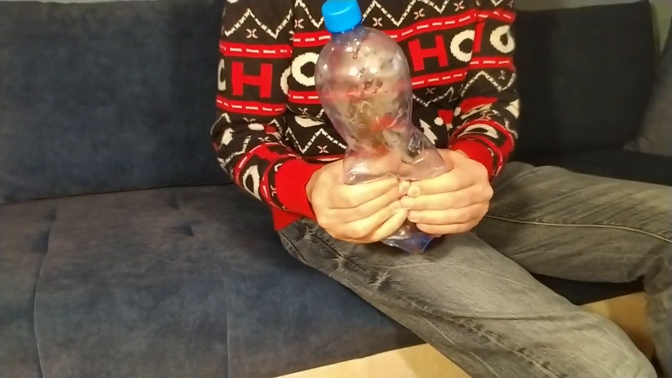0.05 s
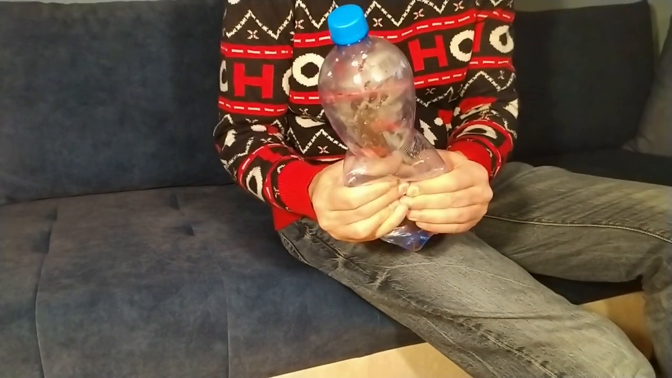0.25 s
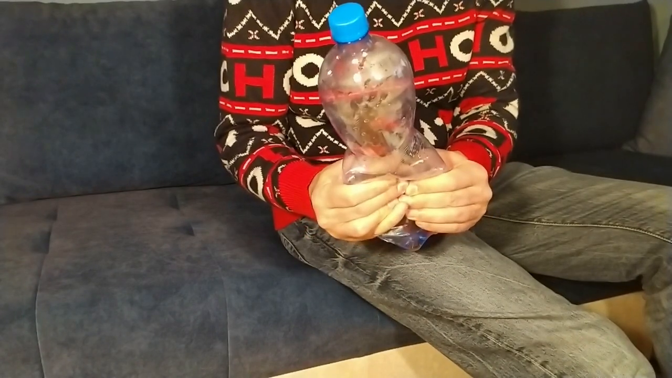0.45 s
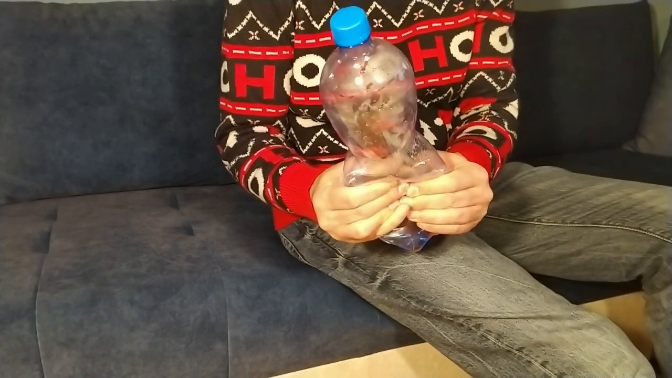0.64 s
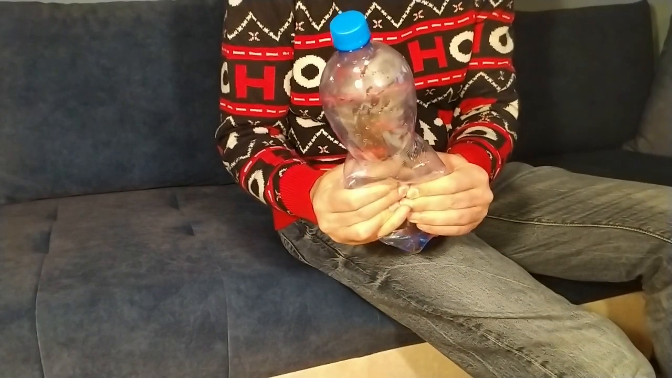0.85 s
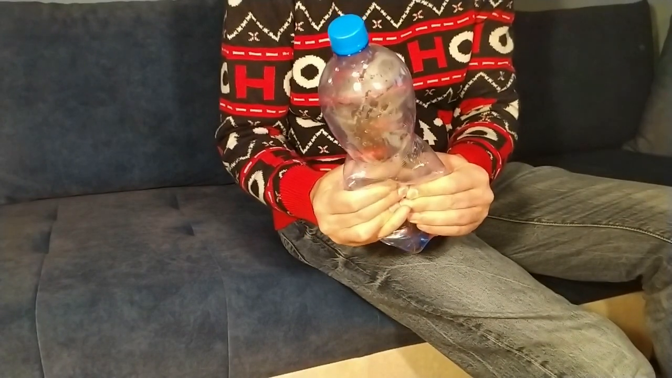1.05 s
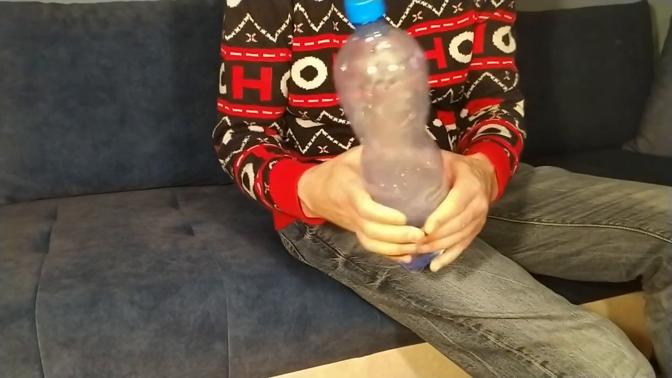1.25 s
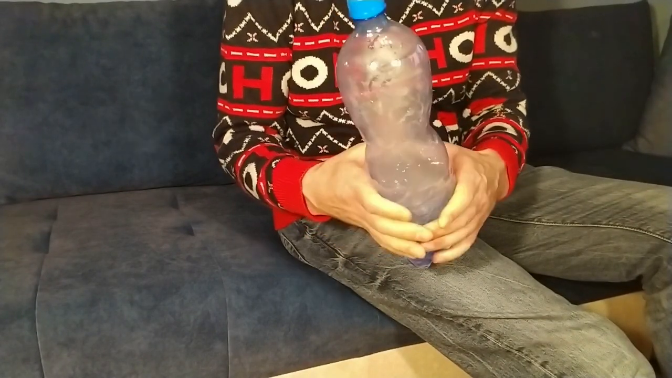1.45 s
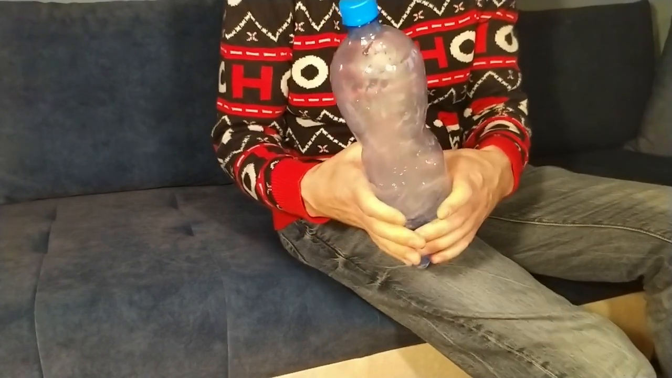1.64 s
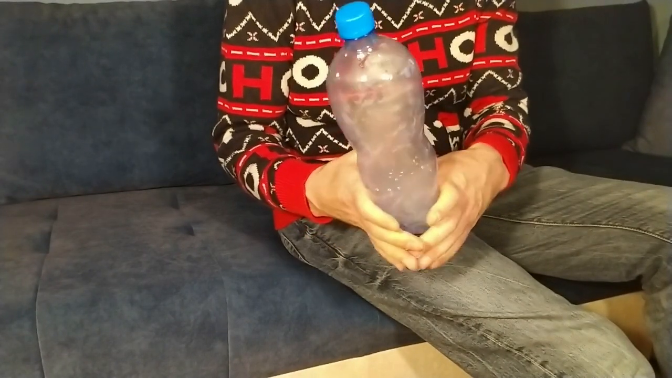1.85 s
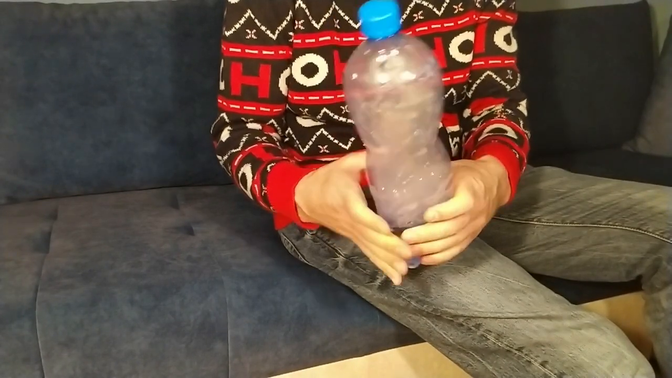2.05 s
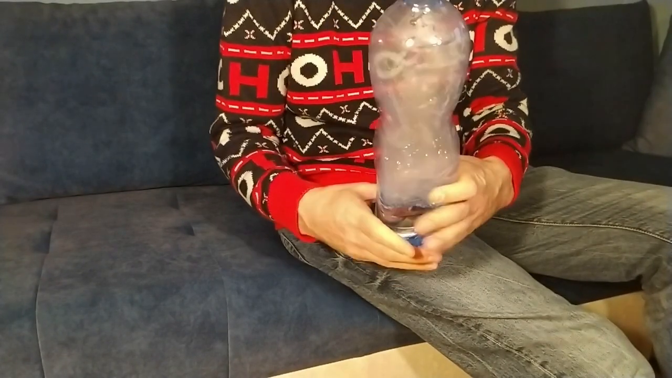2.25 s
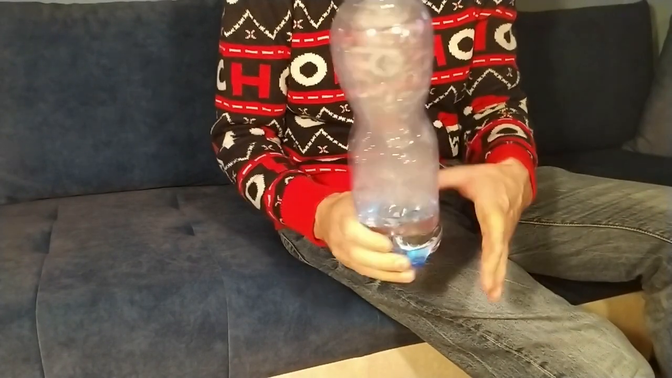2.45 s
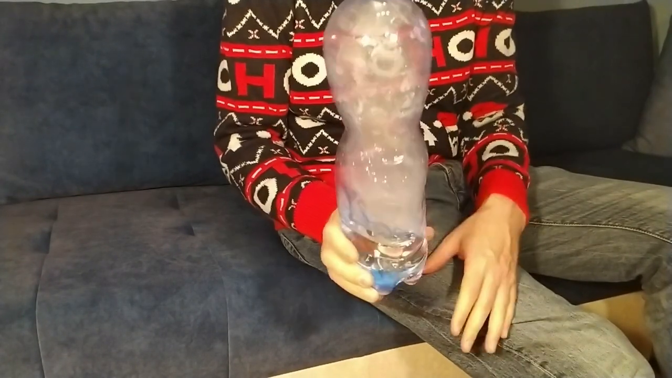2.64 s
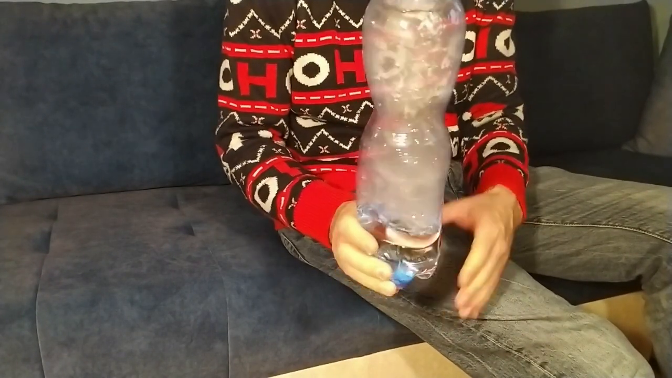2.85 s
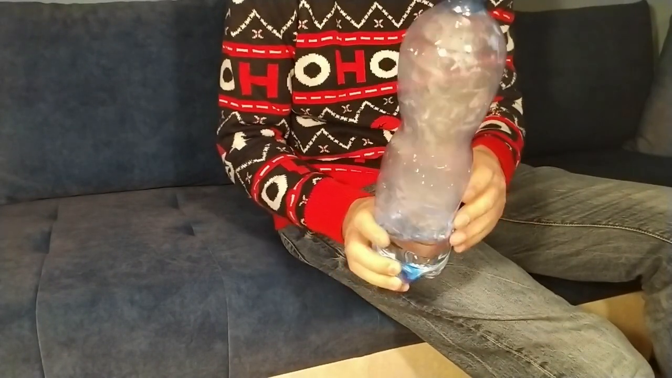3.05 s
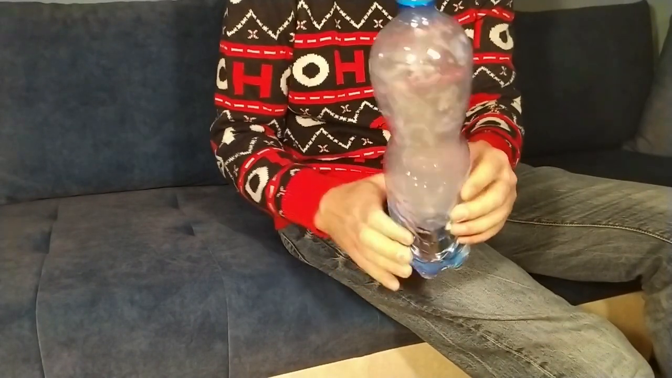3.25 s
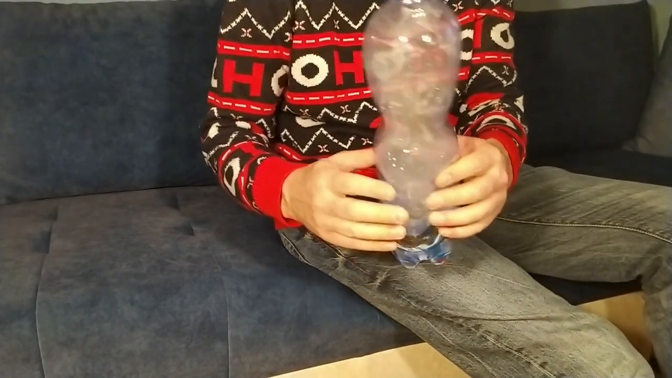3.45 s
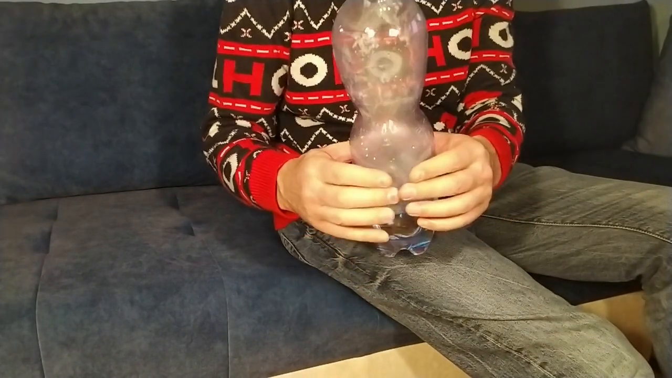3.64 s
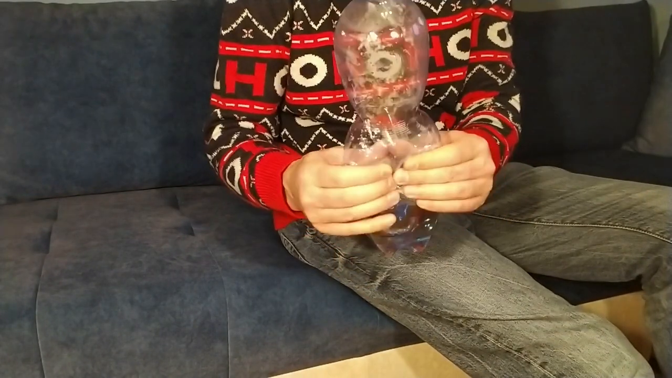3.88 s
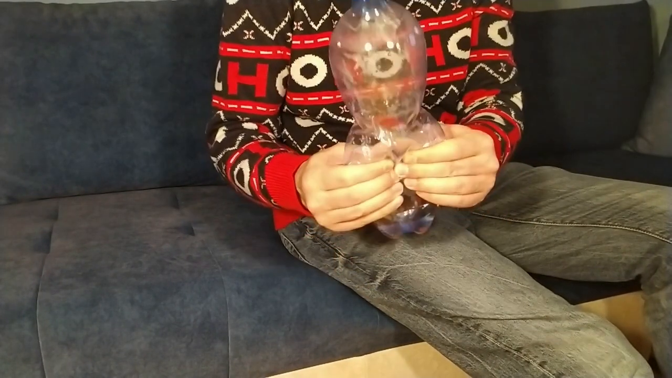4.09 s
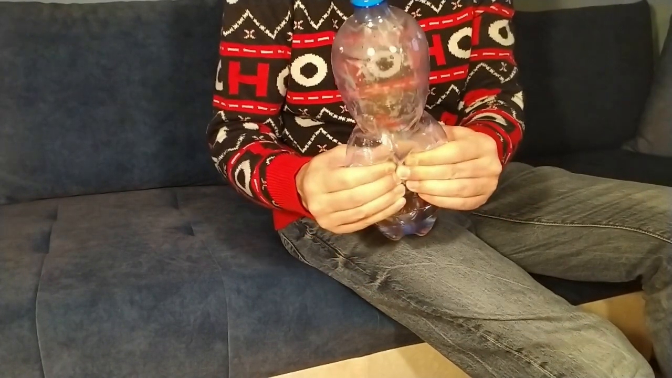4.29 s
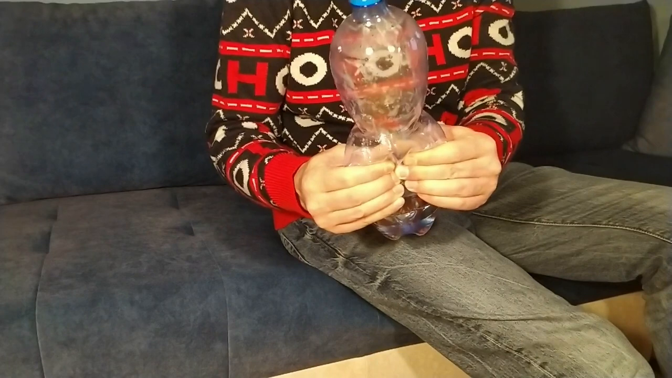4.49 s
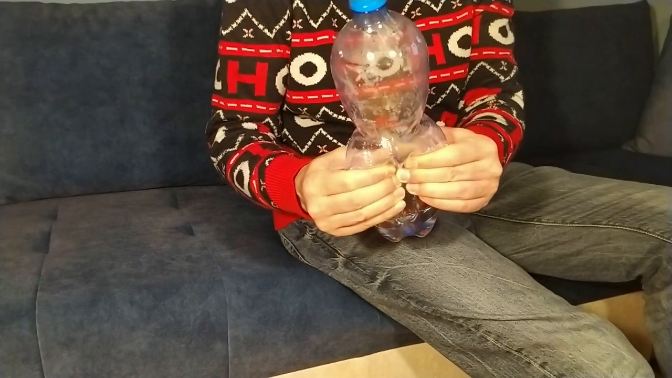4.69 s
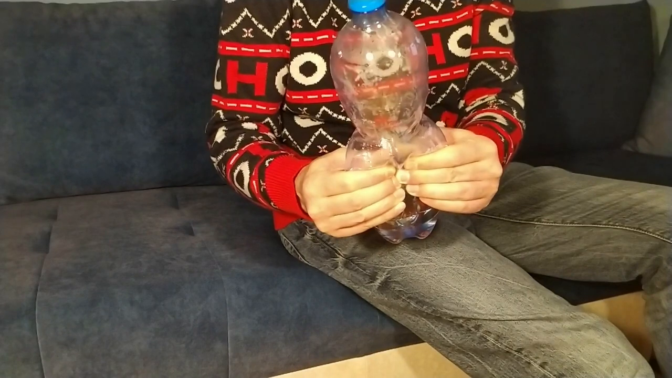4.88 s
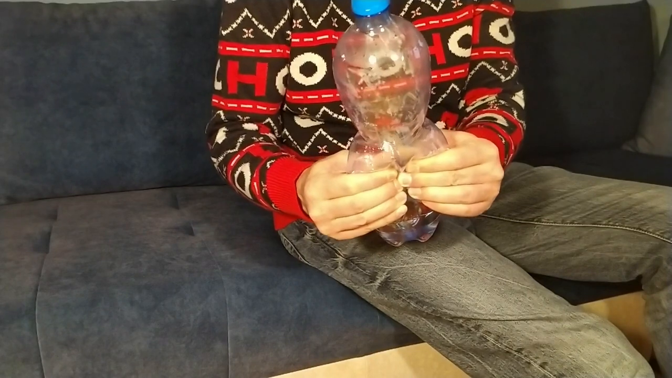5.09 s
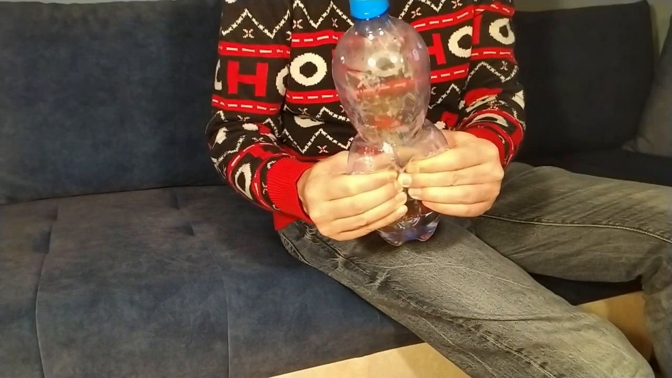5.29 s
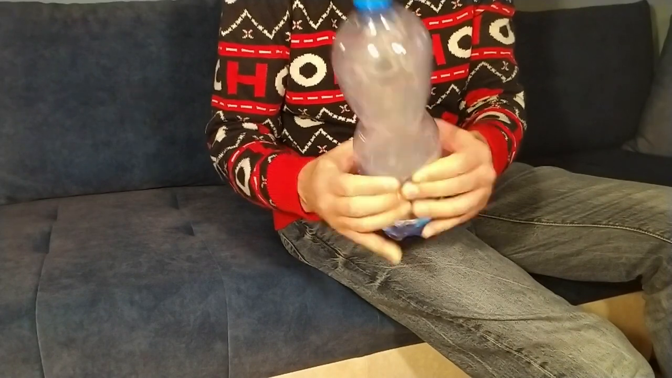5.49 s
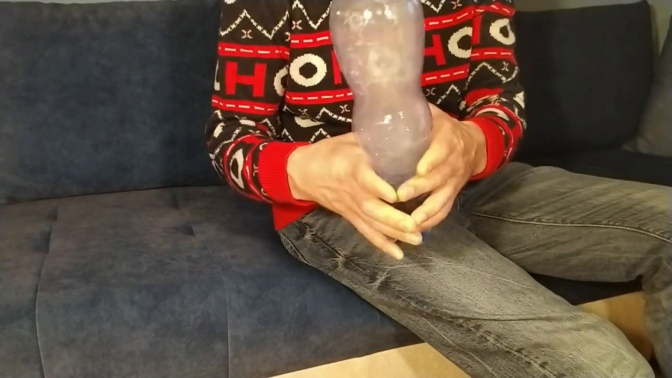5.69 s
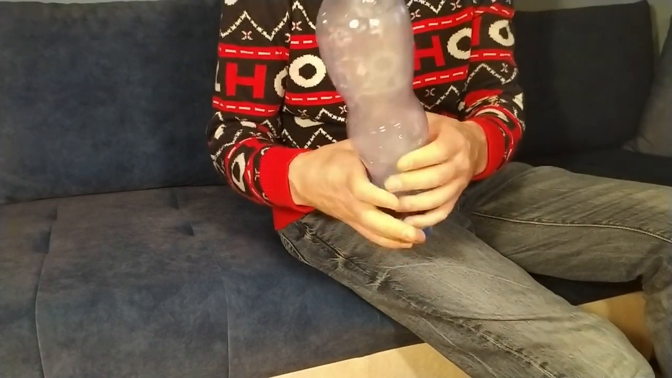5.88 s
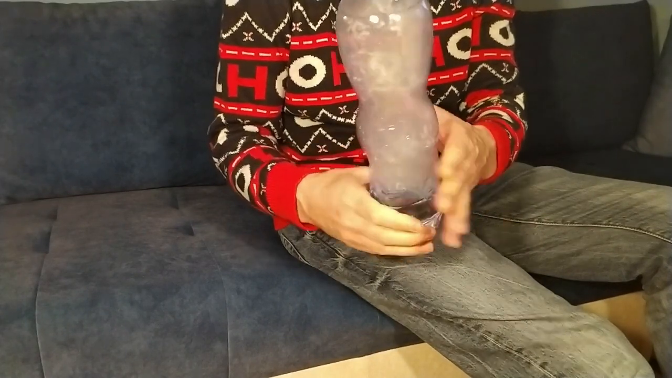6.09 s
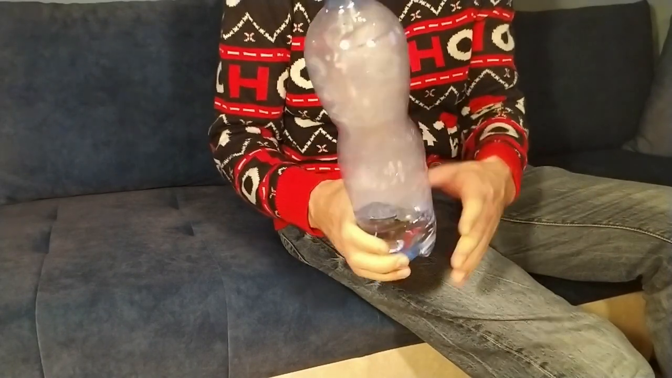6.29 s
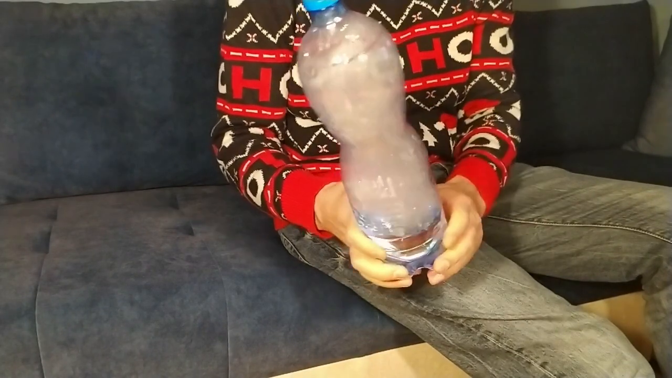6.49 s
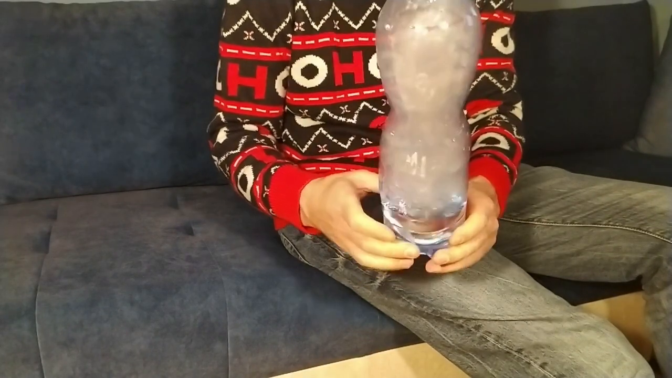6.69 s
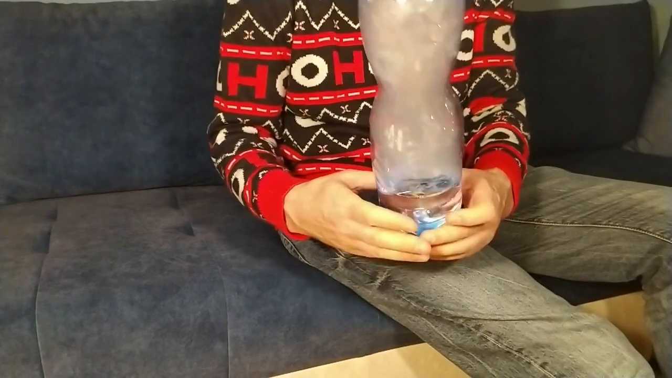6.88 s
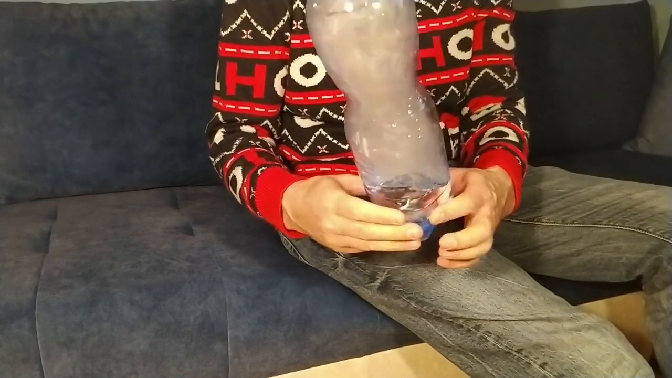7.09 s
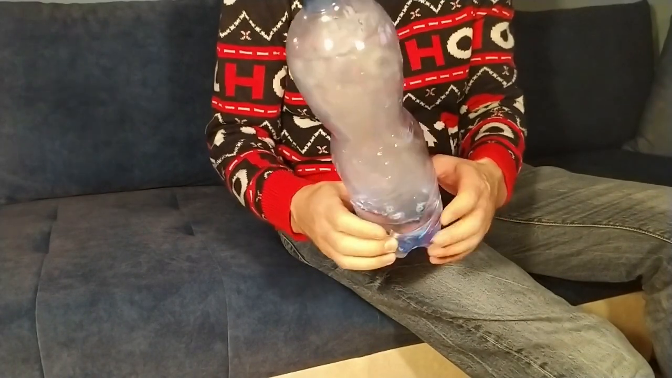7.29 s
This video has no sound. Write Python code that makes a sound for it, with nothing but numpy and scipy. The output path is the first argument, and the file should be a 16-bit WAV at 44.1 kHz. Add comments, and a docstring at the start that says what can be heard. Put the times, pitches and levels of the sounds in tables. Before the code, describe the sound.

Bursts of loud plastic snapping and popping as hands crush an empty drink bottle and let it spring back, with soft finger taps indoors.

```python
"""A thin plastic bottle is crushed and let go twice by hand, a metre or so from a stereo microphone in a small living room.
Each dent that buckles or springs back sends a bending wave through the wall: a sharp tick, then a short falling pop.
Small creases crackle while the wall moves; fingers tap it softly as they change grip, and one fingertip slips.
The regaining of shape adds two deep pushes of air. The room answers every snap, over faint rumble and hiss."""
import sys
import numpy as np
from scipy import signal
from scipy.fft import rfft, irfft, next_fast_len
from scipy.io import wavfile
from scipy.ndimage import map_coordinates

SR = 44100
rng = np.random.default_rng(int(sys.argv[2]) if len(sys.argv) > 2 else 0)


def waveform_to_disk(signal):
    """Save audio, clipped to [-1, 1], as 16-bit WAV at the path in sys.argv[1]."""
    frames = np.transpose(np.atleast_2d(signal))
    scaled = np.clip(frames, -1, 1) * 32767
    samples = np.round(scaled).astype(np.int16)
    wavfile.write(sys.argv[1], SR, samples)


N = 323253
TOP_HZ = 16150  # band limit
SPAN = 24576  # samples in which one snap dies away
HZ, T = np.fft.rfftfreq(SPAN, 1 / SR), np.arange(SPAN) / SR


def amp(db):
    """Decibels to gain."""
    return 10 ** (np.asarray(db) / 20)


def along(points, hz):
    """(Hz, value) points read on a log frequency axis."""
    f, v = np.transpose(points)
    return np.interp(np.log(hz + 1), np.log(f + 1), v)


def unit_energy(x):
    """Each channel scaled to energy 1."""
    return x / np.linalg.norm(x, axis=-1, keepdims=True)


def causal(db):
    """Minimum-phase response with the given gain on the HZ grid, by folding the cepstrum."""
    cepstrum = irfft(np.log(amp(db)))
    cepstrum[1:SPAN // 2] *= 2
    cepstrum[SPAN // 2 + 1:] = 0
    return np.exp(rfft(cepstrum))


def peak(hz, width_hz):
    """Bell of height 1 on the HZ grid."""
    return 1 / (1 + (2 * (HZ - hz) / width_hz) ** 2)


def paired(z, likeness):
    """Two unrelated spectra blended into left and right."""
    turn = np.arccos(np.clip(likeness, -1, 1)) / 2
    mid = z[0] * np.cos(turn)
    side = z[1] * np.sin(turn)
    return np.array([mid + side, mid - side])


# rumble and hiss spectrum: [f/Hz, density/dB per Hz, relative]
QUIET_HZ_DB = [(20, -3), (38, -14.5), (60, -13.5), (81, -23.5), (104, -13.5), (138, -24.5), (210, -19.5),
               (300, -28), (400, -29), (570, -32.5), (3300, -49), (10500, -48.5), (12000, -54),
               (16000, -71.5)]
# left-right likeness of the rumble and hiss: [f/Hz, likeness]
QUIET_LIKENESS = [(30, 0.19), (120, 0.0075), (400, 0.19), (1500, 0), (8000, 0.033)]


def still_room(level_db):
    """Low rumble of the house and microphone hiss, as shaped noise."""
    size = next_fast_len(N + SPAN)
    hz = np.fft.rfftfreq(size, 1 / SR)
    z = paired(rfft(rng.standard_normal((2, size))), along(QUIET_LIKENESS, hz))
    noise = irfft(z * amp(along(QUIET_HZ_DB, hz)), size)[:, :N]
    return amp(level_db) * noise / noise.std()


# decay of the room: [f/Hz, t60/s]
ROOM_T60_S = [(100, 0.12), (400, 0.3), (1200, 0.22), (3000, .3), (8000, 0.27), (14000, 0.25)]
# left-right likeness of scattered sound, also read by buckle(): [f/Hz, likeness]
LIKENESS = [(100, 1), (300, 1), (700, 0.057), (1500, .2), (4000, 0.036), (9000, -.1)]


def room_tail(rise_s, early, early_s):
    """Stereo room response: a rise, the first walls in a cluster, then an even decay."""
    hz, t, z = signal.stft(rng.standard_normal((2, SPAN)), SR, nperseg=256)
    decay = amp(-60 * t / along(ROOM_T60_S, hz)[:, None])
    tail = signal.istft(z * decay, SR, nperseg=256)[1][:, :SPAN]
    cluster = 1 + early * np.exp(-((T - rise_s) / early_s) ** 2)
    swell = np.clip(T / rise_s, 0, 1) ** 2 * cluster
    return paired(rfft(unit_energy(tail * swell)), along(LIKENESS, HZ))


# the whole crushed waist springs out: [t/s, level/dB before attack and decay, f/Hz]
SPRINGS_S_DB_HZ = [(1.325, -29.5, 102.5), (5.585, -36.5, 77.1)]


def spring_out(attack_s, t60_s):
    """One deep, short push of air, a decaying sine, each time the bottle regains its shape."""
    out = np.zeros(N + SPAN)
    for s, db, hz in SPRINGS_S_DB_HZ:
        envelope = amp(db - 60 * T / t60_s) * (1 - np.exp(-T / attack_s))
        out[round(s * SR):][:SPAN] += envelope * np.sin(2 * np.pi * hz * T)
    return out[:N]


# soft skin dulls the slip: [f/Hz, level/dB, relative]
SLIP_TONE_HZ_DB = [(100, -19.5), (220, -3), (450, 7), (800, -5), (2200, -2), (2800, -20.5), (5000, -34.5),
                   (12000, -47), (16000, -53)]
SLIP_S, SLIP_ATTACK_S, SLIP_HOLD_S = 4.474, 0.0051, 0.035  # hold counts from the start
SLIP_FALL_DB_PER_S, SLIP_DB = 520, -61


def finger_slip(slips_per_s, room_db):
    """Skin sticks and slips on the squeezed wall in a quick run of tiny random tugs."""
    chance = slips_per_s / SR
    tugs = (rng.random(SPAN) < chance) * rng.standard_normal(SPAN) / np.sqrt(chance)
    fall_db = SLIP_FALL_DB_PER_S * np.maximum(T - SLIP_HOLD_S, 0)
    tugs *= np.clip(T / SLIP_ATTACK_S, 0, 1) * amp(SLIP_DB - fall_db)
    tone = causal(along(SLIP_TONE_HZ_DB, HZ))
    tone /= np.sqrt(np.mean(abs(tone) ** 2))
    direct_and_room = 1 + amp(room_db) * room_tail(rise_s=0.011, early=0.42, early_s=.004)
    sound = irfft(rfft(tugs) * tone * direct_and_room)
    return np.pad(sound, ((0, 0), (round(SLIP_S * SR), N)))[:, :N]


# a wide dent adds only long waves: [f/Hz, share of bulge]
BULGE_SHARE = [(260, 1), (750, 0.08)]
# a slow flip loses the short waves: [f/Hz, share of crispness]
CRISP_SHARE = [(900, 0.042), (2700, 0.22), (4200, 0.65), (7000, 1)]


def flip(strength_db, bulge_db, crisp_db):
    """Spectrum in dB of a dent turning over, from its strength, width and speed."""
    return strength_db + bulge_db * along(BULGE_SHARE, HZ) + crisp_db * along(CRISP_SHARE, HZ)


# fingers changing grip: [t/s, strength/dB, bulge/dB, crease f/Hz]
TAPS_S_DB_HZ = [(1.01, -20, 5, 756), (1.716, -32.5, 26, 1360), (2.306, -21, 5.5, 1090),
                (2.3692, -12, 6.5, 952), (2.77, -13, -2, 1100), (3.1108, -9.5, -4.5, 900),
                (3.621, -13.5, -3, 960), (5.488, -7.5, -9.5, 1490), (5.9084, -9, -7.5, 903),
                (5.961, -21.5, 6, 827), (6.0486, -9, 2, 830), (6.3444, -21.5, 16.5, 1160),
                (6.3668, -8.5, -4.5, 1186), (6.429, -17.5, 8, 869), (6.59, -29.5, 11.5, 1140),
                (6.715, -28, 0, 1480), (6.7474, -17, 4, 830), (6.926, -28.5, 9.5, 1230),
                (7.0108, -15, 7, 1070), (7.196, -7, -1, 1040)]
# a soft fingertip's pop: [f/Hz at the usual crease pitch, level/dB]
TAP_TONE_HZ_DB = [(260, 1), (700, -0.5), (1000, -1.5), (1450, -6), (2400, -12.5), (3600, -24.5),
                  (12000, -29)]


def finger_taps(usual_hz):
    """Dull pops of the wall under the fingertips; their tone moves with the pitch of the crease."""
    rows = []
    for s, db, bulge_db, ring_hz in TAPS_S_DB_HZ:
        tone_db = along(TAP_TONE_HZ_DB, HZ * usual_hz / ring_hz)
        rows.append((s, flip(db, bulge_db, 0) + tone_db, ring_hz))
    return rows


# wall on the move, small creases giving way: [start t/s, end t/s, mid strength/dB]
CRACKLES_S_DB = [(1.246, 1.339, -0.5), (1.851, 1.903, 1.5), (1.951, 2.052, 0), (3.282, 3.36, -14),
                 (3.933, 3.999, -6), (5.529, 5.61, 12)]


def creases(count, scatter_db, bulge_db, crisp_db, crisp_scatter_db, ring_hz, ring_octaves):
    """While the wall moves, small creases snap at uneven moments, each with its own strength, edge and pitch."""
    rows = []
    for start, end, db in CRACKLES_S_DB:
        times = start + (end - start) * (np.arange(count) + rng.random(count)) / count
        for s, (loud, edge, pitch) in zip(times, 2 * rng.random((count, 3)) - 1):
            spectrum_db = flip(db + scatter_db * loud, bulge_db, crisp_db + crisp_scatter_db * edge)
            rows.append((s, spectrum_db, ring_hz * 2 ** (ring_octaves * pitch)))
    return rows


# loud dents: [t/s, strength/dB, bulge/dB (wide dent thumps), crispness/dB (fast flip ticks), crease f/Hz]
SNAPS_S_DB_HZ = [(0.0005, 8, 4, -7, 1090), (0.037, 6, -19, -19, 1018), (0.05, 6.5, 4, -12, 1730),
                 (0.1273, -4, -11, -2.5, 1650), (0.149, -3.5, -3, -20, 870), (1.2054, -1, 12.5, -48, 880),
                 (1.2193, 9.5, -2, -28, 2502), (1.2405, 9, 3.5, -21, 2395), (1.2516, 13.5, -4, -7, 800),
                 (1.2647, 6.5, -6.5, 1, 1110), (1.2815, 7.5, -8.5, 0, 2470), (1.2866, 10, 1.5, -2, 2353),
                 (1.315, 14, 5, -27.5, 1230), (1.326, 4, 14.5, -8, 810), (1.3435, 7, -7.5, -1, 1590),
                 (1.6287, -4.5, -11.5, -41.5, 1240), (1.7431, -6, -5.5, -29, 1590),
                 (1.7675, -5, -18, -25.5, 2620), (1.821, 0.5, 6, -4.5, 2240), (1.8375, 9, 15, -6.5, 1500),
                 (1.842, 7.5, 8, -6, 1490), (1.8735, 9.5, -11, -3, 2260), (1.883, 15, -5, -7.5, 1016),
                 (1.9879, -4, 1.5, 7, 2280), (2.0116, 8.5, -4, -10.5, 2280), (2.05, 5.5, 6.5, -25, 870),
                 (3.1226, 1.5, -4.5, -55.5, 880), (3.2248, -2.5, 1.5, -8.5, 890),
                 (3.2498, 15, -5, -12.5, 1252), (3.265, 0.5, 10, -12.5, 1700),
                 (3.3414, -3.5, 7.5, -1.5, 2280), (3.3672, -5, 8.5, -37, 2170),
                 (3.4961, -6.5, -22, -46.5, 1174), (3.65, 1.5, 5.5, -30, 975), (3.684, -1, 2.5, -11, 1270),
                 (3.6924, 5.5, 2, -17.5, 1230), (3.7158, 1, -10, -18, 1550), (3.7681, 10, -22.5, -25, 1710),
                 (3.794, -0.5, 0.5, 5, 2650), (3.809, 6.5, -9, -21, 1270), (3.819, 9.5, -5, -10.5, 1220),
                 (3.8501, 2, -3, -5, 1570), (3.8595, 5.5, -4, 7.5, 1260), (3.875, 12, -10, -34, 1090),
                 (3.8896, 10, -3.5, -10, 1077), (3.943, 12, -2.5, -27.5, 865), (3.9568, -4, -6, 6, 845),
                 (3.964, 8, -15, -8, 835), (3.9753, 6.5, -7, -17, 784), (4.012, 8, -4, -29.5, 1100),
                 (4.1158, -0.5, -2.5, -25.5, 1090), (5.5014, 15, -5.5, -27.5, 2560),
                 (5.5134, 11.5, -7, -25.5, 1170), (5.5218, 13.5, 2.5, -22, 1060),
                 (5.5426, -0.5, -8.5, 4, 1410), (5.5559, 4, -4.5, 3, 1450), (5.563, 17, 0, -7.5, 1440),
                 (5.569, 13.5, -1.5, -10.5, 1340), (5.581, 11.5, 7, -8, 1060), (5.5976, 8, 7.5, -3, 1530),
                 (5.629, 18, 0, -1.5, 2390), (6.117, -6, 8, -29.5, 969), (6.1427, -3.5, 1, -19, 2170),
                 (7.0694, 14.5, -9, -6.5, 1450), (7.2115, 4, -1, -30, 1130), (7.2278, 1.5, 9, -28, 1330)]


def dents():
    """The loud snaps as (s, spectrum dB, pitch of the crease Hz)."""
    return [(s, flip(db, bulge_db, crisp_db), ring_hz) for s, db, bulge_db, crisp_db, ring_hz in SNAPS_S_DB_HZ]


def buckle(scatter, scatter_s, lap_s, lap_gain):
    """A dent flips: one sharp step, scattered by ribs and creases, that comes round the bottle once more."""
    ribs = unit_energy(rng.standard_normal((2, SPAN)) * np.exp(-T / scatter_s))
    ribs = paired(rfft(ribs), along(LIKENESS, HZ / 2))
    share = np.clip(scatter * (HZ / 4000 + .01) ** 0.083, 0, .95)  # short waves scatter most
    lap_cycles = HZ * lap_s * rng.uniform(.6, 1.4) + rng.random()  # random delay and phase
    lap = lap_gain * np.exp(-HZ / 2500 - 2j * np.pi * lap_cycles)
    return (np.sqrt(1 - share) + np.sqrt(share) * ribs + lap) / np.sqrt(1 + abs(lap) ** 2)


def bending(travel_s):
    """Bending waves speed up with the root of frequency, so the treble arrives first."""
    # delay/s = travel_s * (sqrt(1000 / f) - sqrt(1000 / TOP_HZ)): counted from the arrival at TOP_HZ
    cycles = travel_s * (2 * np.sqrt(1000 * HZ) - HZ * np.sqrt(1000 / TOP_HZ))
    return np.exp(-2j * np.pi * cycles)


def dent_modes(hollow_hz, ring_hz, hollow_db, ring_db, sharpness, crowd_db, spacing_hz):
    """A dent's own resonances in dB: the panel round it, the stiff crease, and a crowd of higher modes."""
    def mode(hz):
        """A mode draws energy from its neighbourhood: a peak in a wide dip."""
        return peak(hz, hz / sharpness) - 0.24 * peak(hz, hz)

    crowd = np.tanh(map_coordinates(rng.standard_normal(256), [HZ / spacing_hz], mode="mirror"))
    crowd *= np.clip(HZ / 6000, 0, 1)
    return hollow_db * mode(hollow_hz) + ring_db * mode(ring_hz) + crowd_db * crowd


# how well the wall radiates: [f/Hz, level/dB]
WALL_HZ_DB = [(30, -22), (60, -19.5), (90, -6.5), (124, -15.5), (155, -3.5), (195, -4.5), (250, 4),
              (1500, 2), (3100, -6), (5000, -4.5), (7000, -2.5), (10300, 3), (12000, -15.5), (15000, -29),
              (16200, -40)]
# resonances of the bottle: [f/Hz, width/Hz, level/dB]
BODY_HZ_HZ_DB = [(144, 17, 6.5), (750, 70, 2.5), (1530, 120, 0), (2700, 730, 3.5), (4150, 740, 2.5),
                 (8430, 500, 2.5)]
# channel balance: [f/Hz, left minus right/dB]
LEAN_HZ_DB = [(60, 1.5), (150, 6), (300, 6), (600, 2.5), (1100, 3), (2200, -1), (8000, -3), (13000, -1)]
# sound aimed straight at the microphone: [f/Hz, level/dB]
BEAM_HZ_DB = [(150, -1.5), (700, 2.5), (1400, 3), (2700, 2.5), (6000, -1), (11000, -4.5)]
# panel under the fingers, high while pressed taut, low as it springs out: [t/s, f/Hz]
PANEL_S_HZ = [(0, 715), (1.265, 680), (1.29, 350), (2.05, 380), (2.35, 640), (3.12, 630), (3.22, 390),
              (3.37, 390), (3.77, 690), (5.52, 685), (5.545, 440), (5.57, 440), (5.63, 235), (6.6, 270),
              (7.07, 470), (7.22, 235)]
# the hands turn the bottle, dents face the microphone more or less squarely: [t/s, short-wave level/dB]
FACING_S_DB = [(0, 0.5), (1.22, 0), (1.33, 2.5), (1.63, 3.5), (1.82, -2.5), (2.05, 1.5), (3.25, 2),
               (3.65, -0.5), (3.82, 1), (3.97, 1), (5.56, -1.5), (5.6, 0), (5.63, 0), (5.9, 0),
               (6.35, -3.5), (7.07, 2)]


def bottle(snaps, direct_db, room_db, steady_share):
    """Every snap in its own colour, a bending wave heard straight and off the walls."""
    out = np.zeros((2, N + SPAN))
    body_db = along(WALL_HZ_DB, HZ) + sum(db * peak(hz, width_hz) for hz, width_hz, db in BODY_HZ_HZ_DB)
    balance = amp(np.array([[.5], [-.5]]) * along(LEAN_HZ_DB, HZ))
    path = bending(travel_s=0.0031) * balance
    straight = amp(direct_db + along(BEAM_HZ_DB, HZ))
    beaming = HZ ** 2 / (HZ ** 2 + 220 ** 2)  # long waves spread evenly whichever way the dent faces
    fade = np.clip(2 - 2 * T / T[-1], 0, 1)
    usual, *tails = [room_tail(rise_s=0.0088, early=0.11, early_s=0.012) for _ in range(24)]
    share = np.clip(steady_share, 0, 1)
    for s, flip_db, ring_hz in snaps:
        hollow_hz = np.interp(s, *np.transpose(PANEL_S_HZ))
        modes_db = dent_modes(hollow_hz, ring_hz, hollow_db=6.5, ring_db=7, sharpness=7.1,
                              crowd_db=7.0, spacing_hz=257.9)
        colour = causal(body_db + modes_db + flip_db)
        step = buckle(scatter=.78, scatter_s=.0018, lap_s=.003, lap_gain=.6)
        facing = amp(np.interp(s, *np.transpose(FACING_S_DB)) * beaming)
        direct = step * straight * facing * causal(0.5 * modes_db)  # the modes stand out most close up
        # each dent faces another way, so only part of the room's answer repeats
        echo = np.sqrt(share) * usual + np.sqrt(1 - share) * tails[rng.integers(len(tails))]
        sound = fade * irfft(colour * path * (direct + amp(room_db) * echo))
        out[:, max(round(s * SR), 0):][:, :SPAN] += sound
    return out[:, :N]


def scene():
    """The bottle and the hand in the quiet room."""
    taps = finger_taps(usual_hz=970)
    crackle = creases(count=2, scatter_db=4, bulge_db=-3.5, crisp_db=-8.5, crisp_scatter_db=7.5,
                      ring_hz=1650, ring_octaves=0.97)
    plastic = bottle(dents() + taps + crackle, direct_db=-2.76, room_db=-0.99, steady_share=0.56)
    push = spring_out(attack_s=0.012, t60_s=0.18)
    slip = finger_slip(slips_per_s=1400, room_db=4.5)
    return plastic + push + slip + still_room(level_db=-61.5)


def record(dry):
    """The recorder's band limit: a 500 Hz wide slope centred on TOP_HZ, nothing above it."""
    size = next_fast_len(N + SPAN)
    passed = np.clip((TOP_HZ - np.fft.rfftfreq(size, 1 / SR)) / 500 + .5, 0, 1)
    return irfft(rfft(dry, size) * passed, size)[:, :N]


dry = scene()
out = record(dry)
waveform_to_disk(out)
```